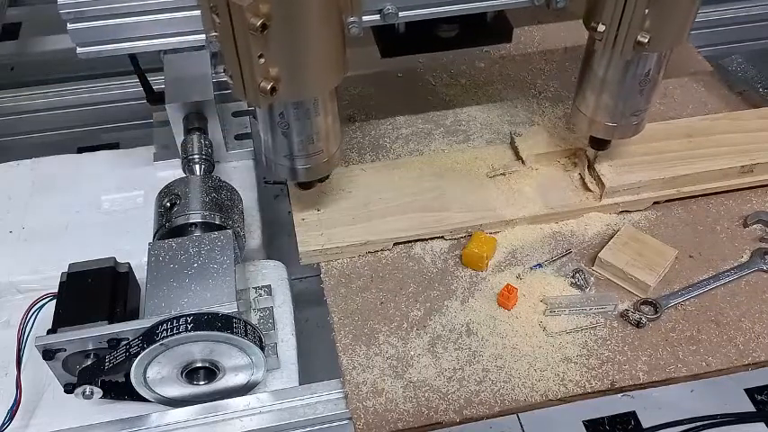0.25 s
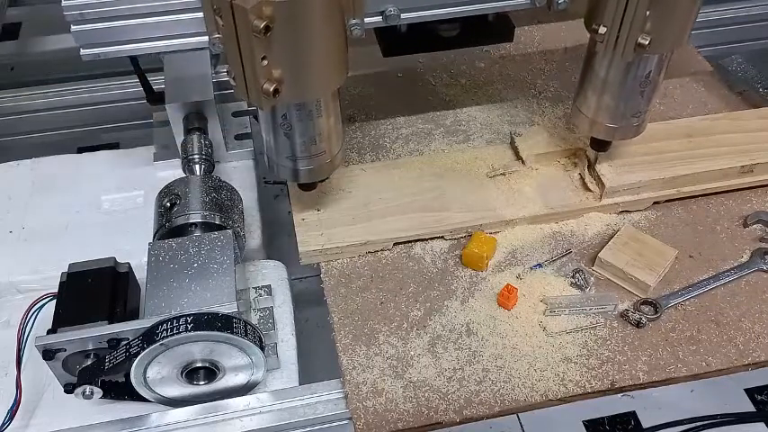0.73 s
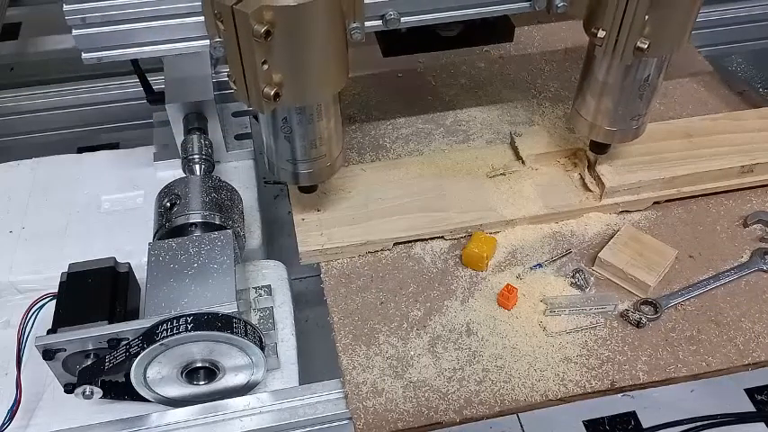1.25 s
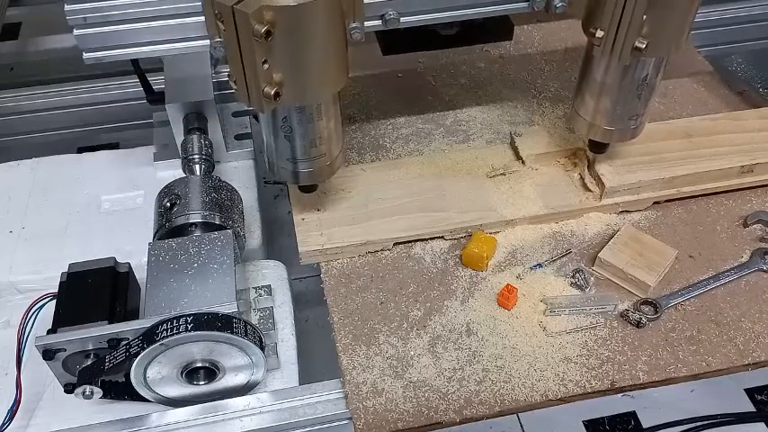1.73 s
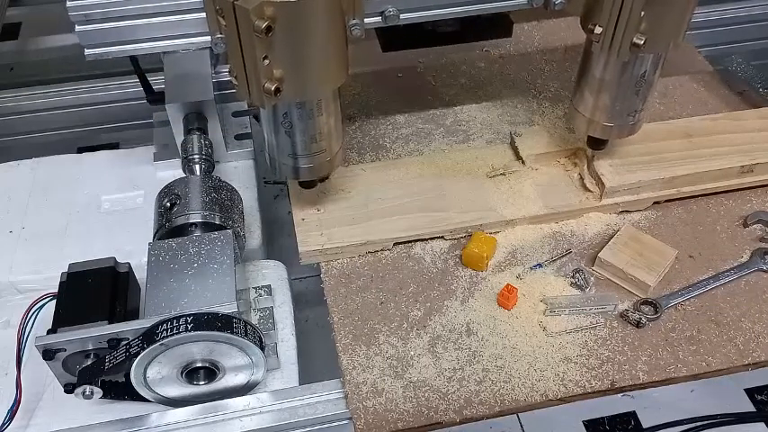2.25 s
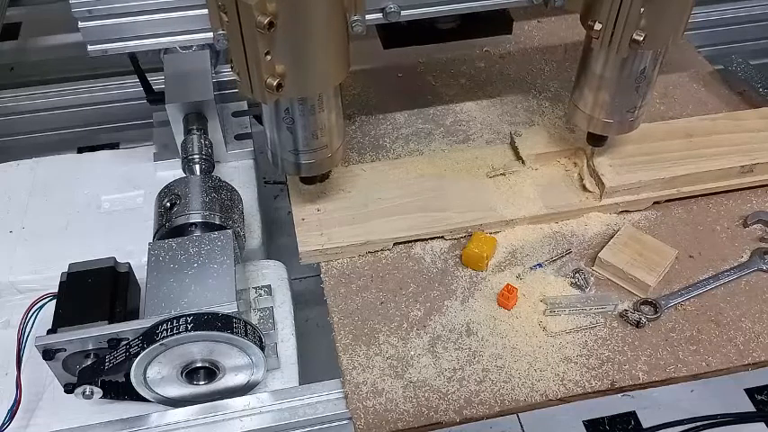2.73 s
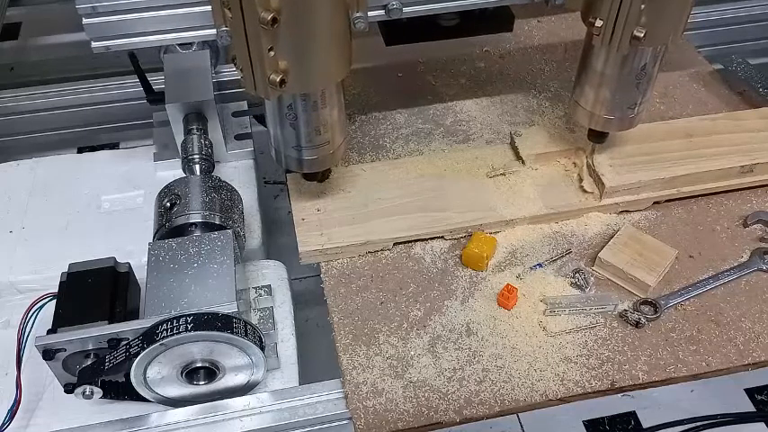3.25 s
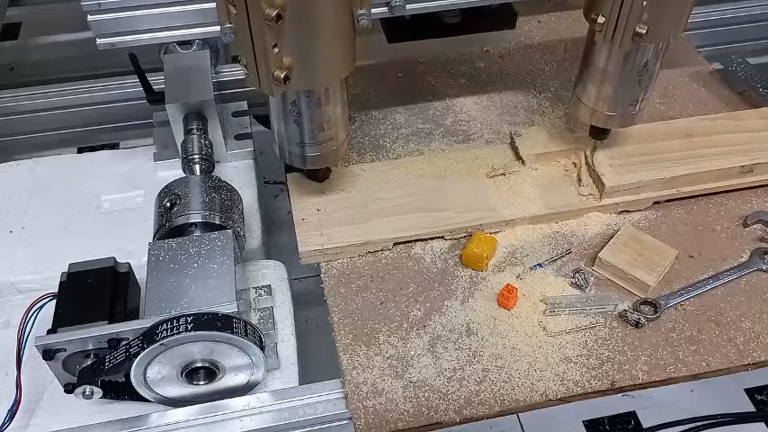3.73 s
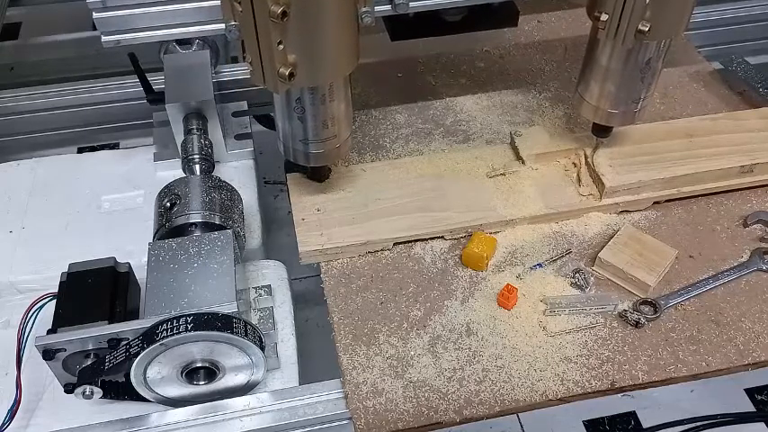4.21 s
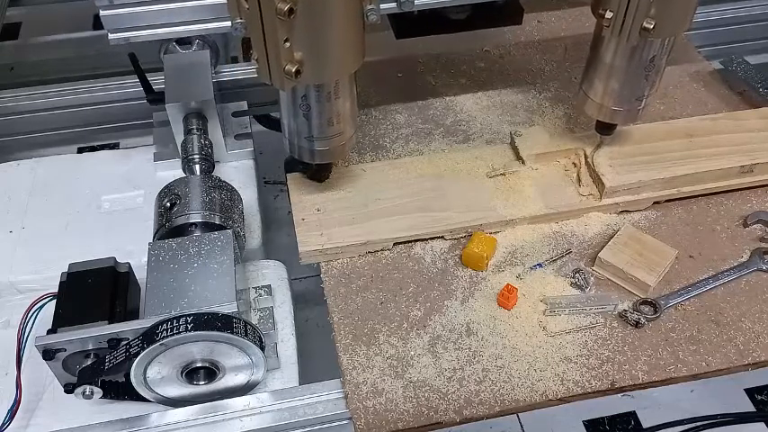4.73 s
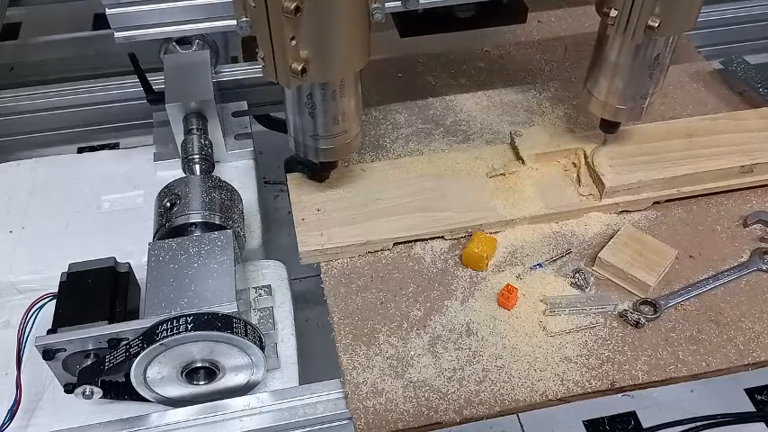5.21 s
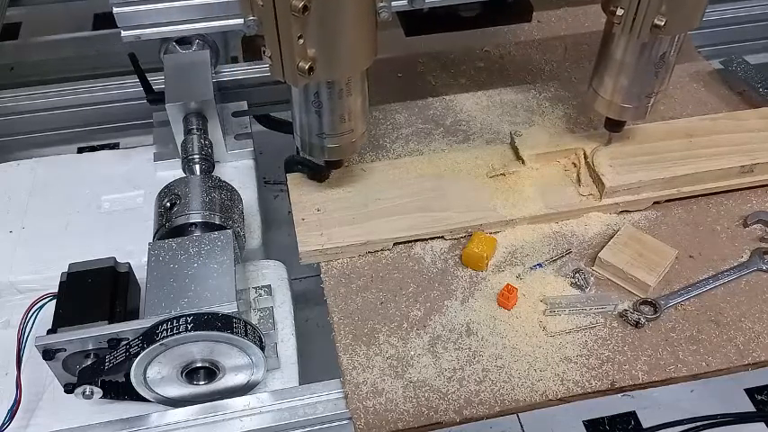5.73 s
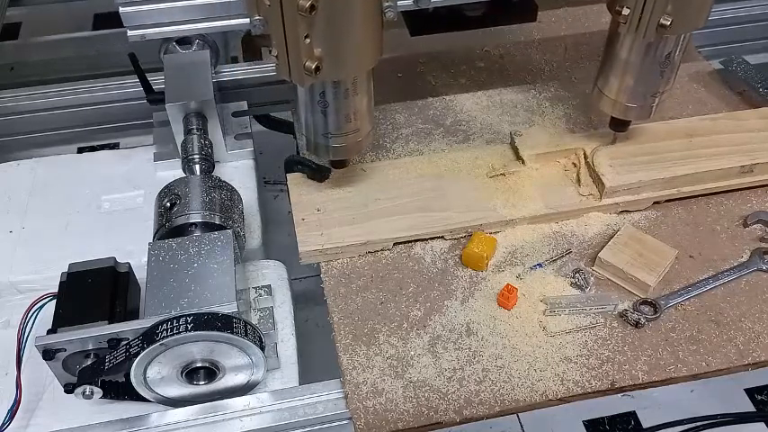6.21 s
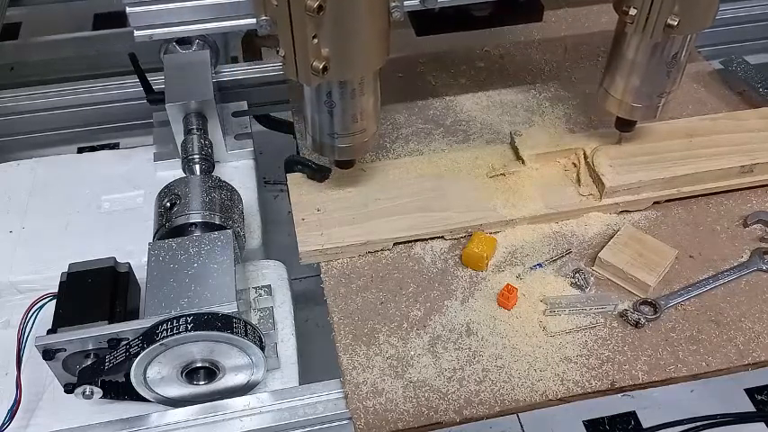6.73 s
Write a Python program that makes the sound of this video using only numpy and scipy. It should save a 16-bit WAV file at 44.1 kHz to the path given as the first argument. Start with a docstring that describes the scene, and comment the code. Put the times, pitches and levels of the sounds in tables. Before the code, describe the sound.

Two router spindles whine steadily in a workshop, heard from close by, as the machine shudders briefly to a slower pace. The cutters then grind into wood, with swelling drones, splintery rasping and hissing chips. Midway a piercing, chattering squeal takes over and the hiss fades. The squeal wavers and weakens near the end while the milling continues.

```python
"""CNC router milling a board

Close up in a workshop, a two-spindle carriage brakes from a fast move and the spindles whine freely.
The cutters sink into the wood and rasp once a turn, hissing with chips and making the board drone.
Halfway a cutter chatters with a shrill squeal, while the stepper motors steer round an arc."""
import sys
import numpy as np
from scipy.fft import rfft, irfft, next_fast_len
from scipy.io import wavfile
from scipy.ndimage import uniform_filter1d, map_coordinates

SR = 44100
rng = np.random.default_rng(int(sys.argv[2]) if len(sys.argv) > 2 else 0)


def int16_out(signal):
    """Quantize to a 16-bit WAV file."""
    q = np.round(np.clip(np.atleast_2d(signal).T, -1, 1) * 32767)
    wavfile.write(sys.argv[1], SR, q.astype(np.int16))


N = 306936
TIME = np.arange(N) / SR
TURN_HZ, BEND_HZ = 380, 6648  # nominal spindle speed; the cutter's bending mode
TOUCH_S, CATCH_S = 1.007, 3.46  # the cutters touch the wood; one catches and breaks into full chatter


def amp(db):
    """Decibels to gain."""
    return 10 ** (np.asarray(db) / 20)


def along(points, hz):
    """Read a table of values over frequency on a log axis."""
    freqs, values = np.transpose(points)
    return np.interp(np.log(hz + 1), np.log(freqs + 1), values)


def curves(rows):
    """One automation curve for each column after the time."""
    times, *columns = np.transpose(rows)
    return [np.interp(TIME, times, column) for column in columns]


def gate(start, end):
    """A soft gate from start to end, in seconds."""
    return uniform_filter1d(1. * ((TIME >= start) & (TIME <= end)), size=1500)


def during(rows):
    """A soft gate over the time that a table covers."""
    return gate(rows[0][0], rows[-1][0])


def wobble(rate):
    """A smooth random curve, rate knots a second."""
    knots = rng.standard_normal(int(N * rate / SR) + 4)
    return map_coordinates(knots, [TIME * rate])


def angle(hz):
    """Running phase of a frequency curve."""
    return 2 * np.pi * np.cumsum(hz) / SR


def filtered(x, response):
    """Filter x by a gain that is a function of frequency."""
    size = next_fast_len(N + 8192)
    return irfft(rfft(x, size) * response(np.fft.rfftfreq(size, 1 / SR)), size)[..., :N]


def flutter(rough, rate):
    """A complex gain that strays around 1 in size and phase."""
    return 1 + rough * (wobble(rate) + 1j * wobble(rate))


def partial(phase, rough, rate, skew=0, pan_db=0):
    """A fluttering complex stereo partial; skew is the phase between the ears in radians."""
    wave = flutter(rough, rate) * np.exp(1j * phase)
    left, right = amp(pan_db / 2), amp(-pan_db / 2)
    pair = np.array([left * wave * np.exp(1j * skew / 2), right * wave * np.exp(-1j * skew / 2)])
    return 2 * pair / np.hypot(left, right)


def tone(phase, rough, rate, skew=0, pan_db=0):
    """A partial that starts at a random phase."""
    return partial(phase + rng.uniform(0, 2 * np.pi), rough, rate, skew, pan_db)


# Stereo image of the noise, narrow lows and wide highs (frequency [Hz], left-right correlation [-1..1])
NOISE_IMAGE = [(40, 0.35), (150, 1), (450, 0.72), (900, -0.054), (1600, -0.02), (10000, -0.11)]
def rush(spectrum, echo=0, bursts=1, tooth_hz=0):
    """Stereo noise of rms 1; echo feeds it back a turn later, making a comb with a tooth at tooth_hz."""
    def response(hz):
        spread = np.arccos(np.clip(along(NOISE_IMAGE, hz), -1, 1)) / 2
        comb = 1 / (1 - echo * np.exp(-2j * np.pi * (hz - tooth_hz) / TURN_HZ))
        return comb * amp(along(spectrum, hz)) * [np.cos(spread), np.sin(spread)]
    mid, side = filtered(bursts * rng.standard_normal((2, N)), response)
    noise = np.array([mid + side, mid - side])
    return noise / np.sqrt(np.mean(noise ** 2) + 1e-20)


# Unbalance hum at the turn rate (time [s], relative level [dB])
HUM_FADER = [(0.0, -40), (0.37, -39.5), (0.5, -48), (1.08, -37.5), (1.63, -39), (2.0, -33.5), (2.25, -37),
             (2.42, -34), (2.6, -41), (3.12, -33), (3.45, -33.5), (3.51, -40.5), (4.21, -45), (5.0, -38),
             (6.55, -33.5), (6.96, -34.5)]
# The hum's octave, before beating (time [s], level [dB])
OCTAVE_FADER = [(0, -50), (1.45, -49.5), (1.56, -53), (1.87, -39), (2.3, -40.5), (2.78, -47), (3.0, -40.5),
                (3.25, -39.5), (3.46, -49), (3.56, -42.5), (4.2, -47), (5.3, -44), (6.96, -47)]
# One spindle falls behind in the wood (time [s], slip [turns/s])
SPINDLE_SLIP = [(1.08, 0), (1.09, .562), (3.94, .562), (3.96, .935)]
def spindle_hum(turn):
    """Unbalance hums on the first two orders; as one spindle lags, the two octaves beat."""
    (hum_db,), (octave_db,), (slip,) = curves(HUM_FADER), curves(OCTAVE_FADER), curves(SPINDLE_SLIP)
    first_null_s = 1.286
    lag = angle(slip)
    depth = 0.81 * (1 - gate(CATCH_S, np.inf) / 2)  # the beat is shallower in chatter
    beat = 1 - depth * np.exp(-2j * (lag - lag[round(first_null_s * SR)]))
    hum = amp(hum_db - 0.58) * tone(turn, rough=0.14, rate=28, skew=0.5, pan_db=-0.5)
    octave = amp(octave_db) * beat * tone(2 * turn, rough=0.15, rate=47, skew=-0.23, pan_db=.5)
    return (hum + octave).real


# Bearing and motor tones (frequency [Hz], relative level [dB])
WHINE_TONES = [(199.2, -69.5), (263.8, -66.5), (576.0, -59.5), (1050, -62), (1445, -72), (2724, -73),
               (3101, -70), (3494, -70), (4188, -68), (5093, -69), (5857, -64), (6239, -64.5),
               (6621, -61.5), (6993, -66), (7381, -58), (7763, -74), (8145, -62), (8592, -71),
               (10110, -66.5)]
# EQ of the cooling air (frequency [Hz], gain [dB])
AIR_EQ = [(25, -13), (120, -7), (250, -2.5), (600, -3), (1000, -13.5), (1400, -15), (3900, -21),
          (4300, -6.5), (4800, -19), (7000, -13), (11000, -17)]
def spindle_whine():
    """Bearings and motors whine steadily over a bed of cooling air."""
    whine = 0
    for hz, db in WHINE_TONES:
        skew = min(hz / 3000, 1.3) * rng.choice([-1, 1])
        pan_db = rng.normal(2.3, 1)
        whine += amp(db - 6) * tone(angle(np.full(N, hz)), rough=0.49, rate=40, skew=skew, pan_db=pan_db)
    return whine.real + amp(-55) * rush(AIR_EQ)


# The motor whistle, before beating (time [s], level [dB])
WHISTLE_FADER = [(0, -57), (1.6, -59), (2.0, -53), (2.6, -59.5), (6.96, -58)]
# Its pulsing, which slows as the motor speeds draw together (time [s], beat rate [Hz])
WHISTLE_PULSE = [(0, 12.4), (.48, 12.4), (.5, 7.4), (1, 7.1), (1.1, 5.9), (1.5, 5.6), (1.65, 7.8)]
def whistle(turn):
    """Both motors whistle on their 14th order, slightly apart, so the whistle pulses."""
    (db,), (beat_hz,) = curves(WHISTLE_FADER), curves(WHISTLE_PULSE)
    beat = 1 - .55 * np.exp(-1j * angle(beat_hz))
    return amp(db) * (beat * tone(14 * turn, rough=.1, rate=60, skew=1.3, pan_db=3)).real


# Whirr above a motor's note (pitch [multiple of the note], relative level [dB])
WHIRR_OVERTONES = [(1.5, -21), (2, -19)]
def motor_note(hz, db, rough):
    """A motor tone with rougher overtones."""
    phase = angle(hz)
    sound = tone(phase, rough=rough, rate=110 * rough, skew=0.5)
    for multiple, level in WHIRR_OVERTONES:
        sound += amp(level) * tone(multiple * phase, rough=2 * rough, rate=130, skew=-1.1)
    return amp(db) * sound.real


# Low beat of the feed against the spindle (time [s], beat rate [Hz], level [dB])
FEED_THROB = [(3.4, 58, -86), (3.55, 53, -73), (3.8, 43, -69), (4.2, 28.5, -73), (4.8, 23, -67),
              (5.1, 22.2, -77.5)]
# Even stepper glides
# (start [s], end [s], first step rate [Hz], last step rate [Hz], base level [dB], roughness [ratio])
STEPPER_MOVES = [(0, 0.306, 1203, 422, -54.5, 0.54), (0, 0.306, 756, 270, -60.5, 0.86),
                 (1.496, 2.253, 198.6, 194, -66, 0.33), (2.293, 3.403, 520, 521, -60.5, 0.25),
                 (3.112, 4.892, 320, 362.4, -64.5, 0.46), (3.399, 5.152, 329.8, 100.8, -67.5, 0.21),
                 (6.504, 6.965, 107, 148, -71, 0.38)]
# Resonances of the frame (centre [Hz], half width [Hz], boost [dB])
FRAME_MODES = [(129.8, 4.9, 15), (328, 5.6, 7), (620, 38, 12), (805, 95, 15.5)]
def steppers():
    """The feed throbs; each axis sings at its step rate and swells as it passes a frame resonance."""
    sound = during(FEED_THROB) * motor_note(*curves(FEED_THROB), rough=0.38)
    for start, end, first_hz, last_hz, db, rough in STEPPER_MOVES:
        hz, = curves([(start, first_hz), (end, last_hz)])
        lift_db = sum(boost / (1 + ((hz - centre) / width) ** 2) for centre, width, boost in FRAME_MODES)
        sound += gate(start, end) * motor_note(hz, db + lift_db, rough)
    return sound


# The braking shudder dies away (time [s], level [dB])
SHUDDER_FADER = [(0, -41), (.08, -41.5), (.2, -42.5), (.35, -45.5), (.42, -56.5), (.55, -65)]
# EQ of the gantry's body (frequency [Hz], gain [dB])
GANTRY_EQ = [(60, -21), (200, -10.5), (380, 6), (560, 3), (760, 7), (1000, -5), (1300, -9.5), (2000, -20),
             (4000, -26)]
def gantry_shudder():
    """Braking shakes the gantry in a short, unsteady rush."""
    db, = curves(SHUDDER_FADER)
    return during(SHUDDER_FADER) * amp(db + 2 * wobble(60)) * rush(GANTRY_EQ)


def sinking():
    """The cutters ease into the wood, from 0 to 1 in 0.12 s."""
    return np.clip((TIME - TOUCH_S) / .12, 0, 1)


def recut(spectrum, echo, bursts):
    """Edges recut last turn's ripples: noise combed on the turn orders, or in chatter on the squeal."""
    caught = gate(CATCH_S, np.inf)
    smooth_cut = rush(spectrum, echo, bursts)
    chatter_cut = rush(spectrum, echo, bursts, tooth_hz=BEND_HZ)
    return (1 - caught) * smooth_cut + caught * chatter_cut


# How hard the cutters bite (time [s], relative load [dB])
CUTTER_LOAD = [(1.0, -100), (1.31, -71), (1.35, -72.5), (1.96, -53.5), (2.46, -57.5), (3.26, -51),
               (4.1, -58), (5.76, -57.5), (6.08, -59.5), (6.96, -57.5)]
FULL_BITE_DB = -52
def bite():
    """The load on the cutters, in dB against a full bite."""
    return curves(CUTTER_LOAD)[0] - FULL_BITE_DB


# EQ of tearing wood (frequency [Hz], gain [dB])
TEAR_EQ = [(40, -19), (150, -20.5), (300, 1.5), (520, 4.5), (670, -0.5), (810, 6.5), (940, -6), (1060, 7),
           (1400, 3), (1680, 6), (2100, -4), (2650, 0.5), (3200, -8), (3700, -3), (4800, -56), (7000, -28)]
# EQ of flying chips (frequency [Hz], gain [dB])
CHIP_EQ = [(150, -9.5), (2000, 0.5), (3500, -11), (4600, 1), (5900, -2.5), (6700, 13), (7200, 10),
           (7700, 2.5), (8400, 4), (9500, -2), (10400, 5.5), (11000, 3)]
# Hiss of the chips (time [s], level [dB])
CHIP_FADER = [(1.1, -47), (1.55, -44.5), (2.2, -38.5), (2.85, -38.5), (3.3, -40.5), (3.55, -42), (4.1, -51),
              (5, -65), (6.96, -64)]
def cutting(turn):
    """Fibres tear and chips leave in a dense stream that pulses lightly once a turn."""
    chip_db, = curves(CHIP_FADER)
    grain_db = .6 * wobble(22)
    tear = amp(-40 + bite() + grain_db) * rush(TEAR_EQ, bursts=np.exp(0.4 * np.cos(turn)))
    chip_gain = amp(chip_db + grain_db + 0.7 * wobble(45))
    chips = chip_gain * recut(CHIP_EQ, echo=0.55, bursts=np.exp(0.25 * np.cos(turn)))
    return sinking() * (tear + chips)


# The board's drones (start [s], time to release [s], order [multiple of turn rate], full level [dB])
DRONE_CUES = [(1.037, 0.23, 3, -43.5), (1.076, 0.16, 6, -49), (1.1, 0.83, 17, -53.5),
              (1.47, 0.39, 5, -44.5), (1.606, 0.46, 4, -34.5), (1.683, 0.14, 3, -48),
              (1.963, 0.73, 3, -42.5), (2.22, 0.37, 6, -52), (2.505, 0.3, 4, -41), (2.75, 0.26, 3, -37),
              (2.744, 0.25, 12, -49), (3.163, 0.27, 6, -45.5), (3.174, 0.33, 3, -38.5),
              (3.177, 0.25, 4, -36.5), (4.149, 0.93, 6, -52.5)]
def drone_envelope(order, attack_s=0.079, release_s=0.093):
    """The board takes up one order for a moment: each drone builds, holds and dies away."""
    envelope = 0
    for start, length, cue_order, db in DRONE_CUES:
        if round(cue_order) == order:
            age = np.maximum(TIME - start, 0)
            attack = 1 - np.exp(-(age / attack_s) ** 2)
            release = np.exp(-np.maximum(age - length, 0) / release_s)
            envelope += amp(db) * attack * release
    return envelope


# Harmonics of the cutting force (order [multiple of turn rate], relative level [dB])
STRIKE_ORDERS = [(3, 1), (4, 0), (5, -4.5), (6, -2), (7, -7), (8, -6.5), (9, -7.5), (10, -13), (12, -10),
                 (17, -15)]
# A fast tremble in the cut, which puts tones between the orders (time [s], depth [0..1])
TREMBLE_DEPTH = [(1.62, 0), (1.78, .36), (1.97, .52), (2.2, .3), (3.4, .15), (3.5, 0)]
STRIKE_DB, TREMBLE_HZ = -49, 116.5
def board(turn):
    """The edges strike every turn, each bite a little different; the board sounds their orders."""
    bite_db = bite()
    blunt_db = .75 * gate(CATCH_S, np.inf)  # per order: chatter blunts the high ones most
    sound = 0
    for order, db in STRIKE_ORDERS:
        order = round(order)
        strike = sinking() * amp(STRIKE_DB + db + 0.33 * bite_db - order * blunt_db + 2 * wobble(4.1))
        size = np.hypot(strike, drone_envelope(order))
        # drones are smooth; higher strike orders are rougher and stray more between the ears
        rough = .06 + min(0.067 * order, .5) * strike / (size + 1e-9)
        skew = rng.normal(-1.62, 0.034 * (order - 2))
        pan_db = 0.6 * order * rng.normal(-0.29, 1)
        sound += size * tone(order * turn, rough=rough, rate=60, skew=skew, pan_db=pan_db).real
    tremble = curves(TREMBLE_DEPTH)[0] * np.cos(angle(TREMBLE_HZ + 7 * wobble(40)))
    uneven_bite = .12 * np.minimum(amp(bite_db), 1) * wobble(TURN_HZ)
    return sound * (1 + tremble + uneven_bite)


# Splintering in the deep part of the cut (time [s], level [dB])
SPLINTER_FADER = [(1.5, -59), (2.1, -52), (2.7, -49.5), (2.85, -44), (3.2, -46.5), (3.6, -44), (4.2, -49),
                  (4.8, -56), (6.96, -70)]
# EQ of its rasp (frequency [Hz], gain [dB])
SPLINTER_EQ = [(1800, -10), (2600, -7), (3300, -8), (4500, -.5), (5300, -2), (6200, -3), (8000, -35)]
def splinters(turn):
    """Deep in the board the edges snap fibres in uneven bursts."""
    db, = curves(SPLINTER_FADER)
    snaps = np.exp(.3 * np.cos(turn)) * amp(2.5 * wobble(160))
    return during(SPLINTER_FADER) * amp(db) * recut(SPLINTER_EQ, echo=.65, bursts=snaps)


# The squeal shifts between the ears as the cutter travels (time [s], left minus right [dB])
SQUEAL_BALANCE = [(3.42, -1), (3.52, -8), (3.85, -9), (4.15, -5), (4.28, 7.5), (5.2, -5), (6.96, -1)]
# The first upper sideband (time [s], level [dB])
SIDEBAND_FADER = [(2.7, -56), (2.85, -45.5), (3.43, -60), (3.48, -35.5), (3.85, -33), (4.1, -29),
                  (4.34, -39), (4.65, -44.5), (5.6, -45), (6.15, -40), (6.96, -38)]
# Weak sidebands (offset [turn rates], relative level [dB], phase between the ears [rad])
WEAK_SIDEBANDS = [(-4, -30, 1), (-3, -21.5, -.8), (-2, -24, 1.4), (-1, -12, 1.8), (4, -26, 1.7),
                  (5, -31, 1.5), (6, -26, -1.2)]
def kicked_swing(turn, db, far_db):
    """The squeal's complex envelope: a kick once a turn sets sidebands one turn rate apart."""
    (pan_db,), (near_db,) = curves(SQUEAL_BALANCE), curves(SIDEBAND_FADER)
    swing = amp(db) * partial(np.zeros(N), rough=0.06, rate=60, skew=1.7, pan_db=pan_db)
    swing += amp(near_db) * partial(turn, rough=0.2, rate=54, skew=1.23, pan_db=1.5)
    swing += amp(far_db - 4.5) * partial(2 * turn, rough=0.24, rate=40, skew=1.62, pan_db=3)
    swing += amp(far_db - 11) * partial(3 * turn, rough=0.33, rate=48, skew=0.98, pan_db=-0.5)
    weak = sum(amp(level) * partial(offset * turn, rough=0.35, rate=120, skew=skew, pan_db=-3)
               for offset, level, skew in WEAK_SIDEBANDS)
    weak_gain = amp(-4) * np.hypot(amp(db), amp(near_db))
    return swing + 1j * weak_gain * weak  # the weak ones swing a quarter cycle ahead


# Sum and difference tones of the cutter's two vibrations
# (squeal multiple [count], sum or difference [+1/-1], offset [turn rates], level [dB], roughness [ratio])
MIXING_TONES = [(1, -1, 0, -16.5, .27), (1, -1, 6, -28, .7), (1, 1, 0, -20, .55), (2, -1, 0, -29.5, .5),
                (2, -1, 1, -26, .64), (2, -1, 2, -29.5, .55)]
SECOND_VIBRATION_HZ = 3891
def cutter_ring(ring, turn):
    """The squeal's carrier: a second vibration mixes with the bending mode and its octave."""
    second = angle(np.full(N, SECOND_VIBRATION_HZ))
    carrier = flutter(rough=0.083, rate=130) * np.exp(1j * ring)
    for multiple, side, offset, db, rough in MIXING_TONES:
        phase = round(multiple) * ring + round(side) * second + round(offset) * turn
        carrier += amp(db) * flutter(rough, rate=170) * np.exp(1j * phase)
    return carrier


# The chatter: a brief try, then the long squeal (time [s], level [dB])
SQUEAL_FADER = [(2.7, -50), (2.85, -39.5), (3.36, -55), (3.43, -56), (3.48, -29.5), (3.6, -28), (4.1, -29),
                (4.25, -32.3), (4.52, -33), (4.6, -30.7), (5.74, -28), (5.82, -31), (5.85, -38),
                (5.91, -37), (5.95, -28.5), (6.05, -28), (6.09, -38), (6.13, -35), (6.58, -36), (6.96, -32)]
# EQ of the scraping edge (frequency [Hz], gain [dB])
SCRAPE_EQ = [(2000, -11), (2800, 0), (4300, -15), (4800, -20), (5100, 10.5), (5600, -21), (6100, -2),
             (6600, 23), (7100, 12), (7800, 3), (8400, 13), (10200, 5), (10900, -24)]
# EQ of the shaking machine table (frequency [Hz], gain [dB])
RUMBLE_EQ = [(20, 4.5), (75, 2), (150, -32), (400, -60)]
SETTLED_DB, SAG_HZ_PER_DB = -30, 2.6  # the pitch sags when the squeal is weaker than its settled level
SHARP_HZ, SETTLE_S = 42, 1  # it starts sharp at the catch, then settles
CATCH_DB, EASE_DB_PER_S = 14.5, 6.5  # the catch throws up far sidebands and rumble, then they ease off
def chatter(turn):
    """The cutter squeals at its bending mode and scrapes; once caught, it adds grit and rumble."""
    db, = curves(SQUEAL_FADER)
    caught, age = gate(CATCH_S, np.inf), np.maximum(TIME - CATCH_S, 0)
    hz = BEND_HZ + caught * SHARP_HZ * np.exp(-age / SETTLE_S) + SAG_HZ_PER_DB * (db - SETTLED_DB)
    thrown_db = caught * np.maximum(CATCH_DB - EASE_DB_PER_S * age, 0)
    far_db = -43 + 0.16 * (db - SETTLED_DB) + thrown_db
    ring = angle(hz + 2 * wobble(20) + 7 * wobble(250))
    squeal = (kicked_swing(turn, db, far_db) * cutter_ring(ring, turn)).real
    scrape = amp(db - 22 + 0.18 * thrown_db) * rush(SCRAPE_EQ, echo=.65, tooth_hz=BEND_HZ)
    rumble = amp(far_db - 26) * rush(RUMBLE_EQ)
    return during(SQUEAL_FADER) * (squeal + scrape) + caught * (grit() + rumble)


# EQ of the grit round the squeal (frequency [Hz], gain [dB])
GRIT_EQ = [(5900, -48), (6150, -14), (6300, 2), (6750, 4), (7100, 4), (7650, -9), (8000, -23), (8500, -50)]
def grit(pulse_hz=9.4, peak_at_s=5.6, floor_db=-50.5, lift_db=8):
    """A gritty edge round the squeal, coming in quick, uneven pulses."""
    pulse = (1 + np.cos(2 * np.pi * pulse_hz * (TIME - peak_at_s))) / 2
    return amp(floor_db + lift_db * pulse ** 3 * (1 + .25 * wobble(9))) * rush(GRIT_EQ)


# Spindle speed, dipping slightly in the cut (time [s], speed [turns/s])
SPINDLE_SPEED = [(0, 381.4), (1.1, 381.3), (2, 380.8), (3.4, 380.5), (4, 380.3), (4.6, 380.8),
                 (6.96, 380.7)]
def scene():
    """One shaft angle drives hum, cut and chatter; the carriage plays alongside."""
    speed, = curves(SPINDLE_SPEED)
    turn = angle(speed + 0.18 * wobble(8))
    spindles = spindle_hum(turn) + spindle_whine() + whistle(turn)
    milling = cutting(turn) + board(turn) + splinters(turn) + chatter(turn)
    return spindles + milling + steppers() + gantry_shudder()


def record(dry, top_hz=10880):
    """A brick-wall low-pass takes the top off the mix."""
    return filtered(dry, lambda hz: hz < top_hz)


dry = scene()
out = record(dry)
int16_out(out)
```